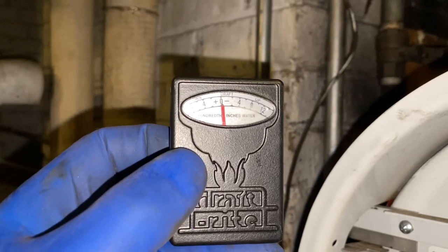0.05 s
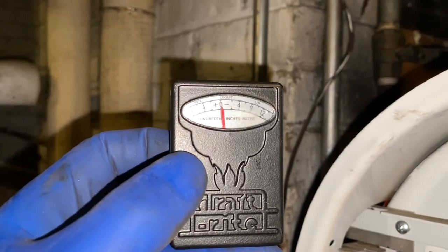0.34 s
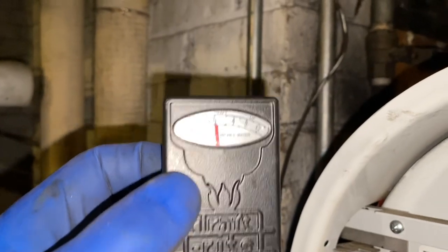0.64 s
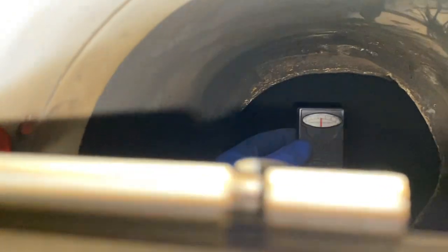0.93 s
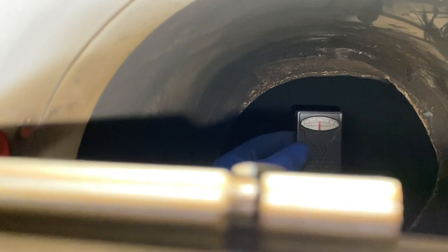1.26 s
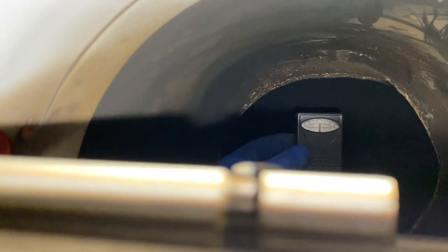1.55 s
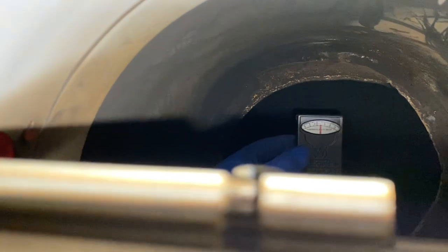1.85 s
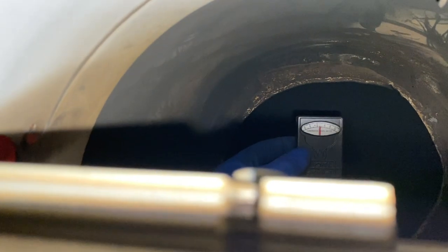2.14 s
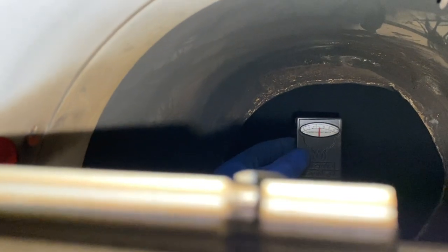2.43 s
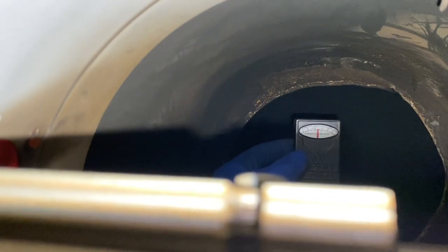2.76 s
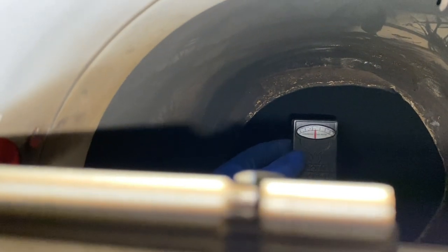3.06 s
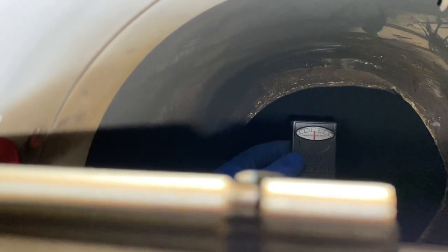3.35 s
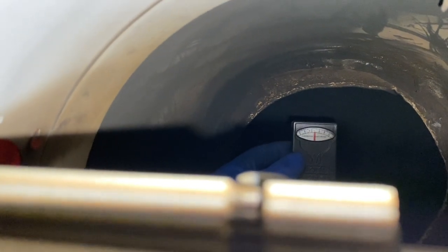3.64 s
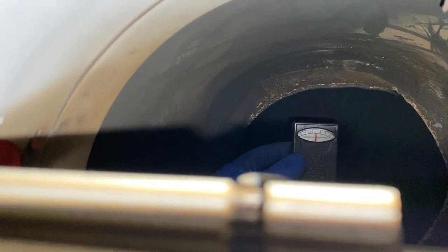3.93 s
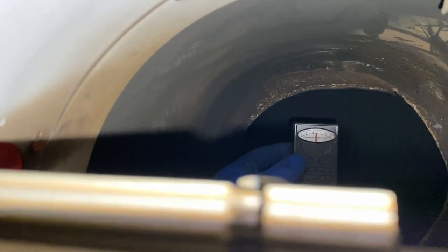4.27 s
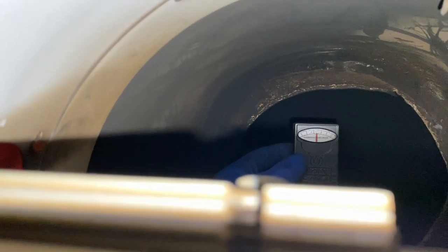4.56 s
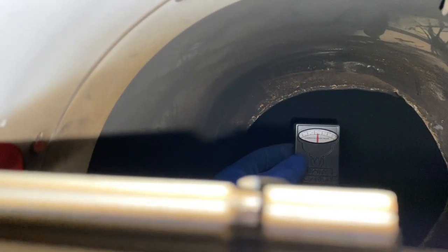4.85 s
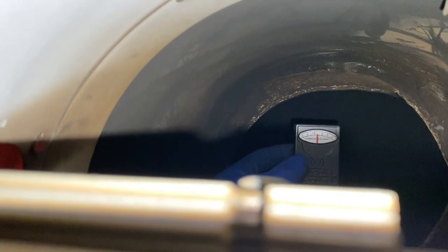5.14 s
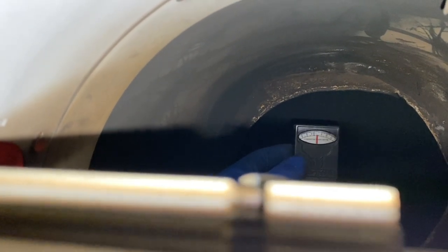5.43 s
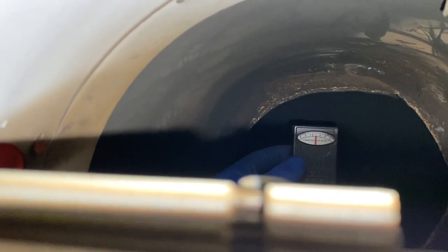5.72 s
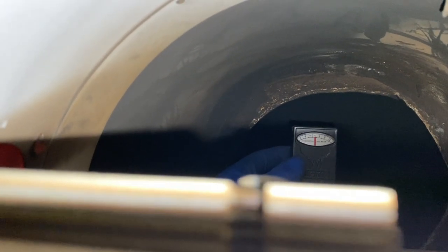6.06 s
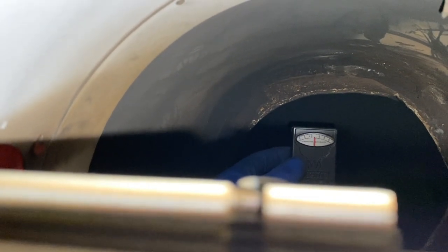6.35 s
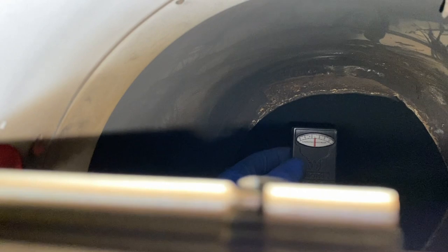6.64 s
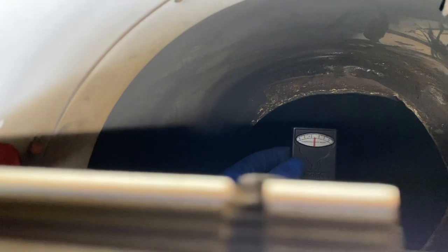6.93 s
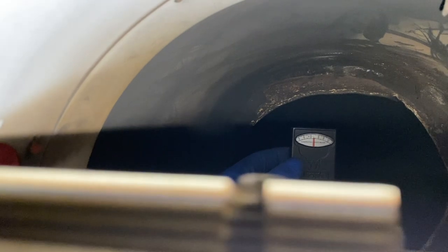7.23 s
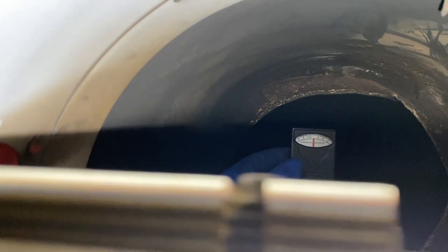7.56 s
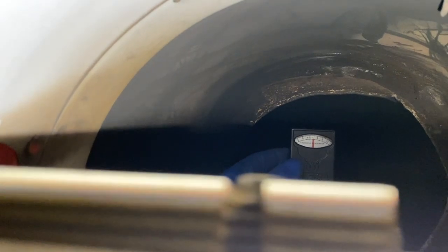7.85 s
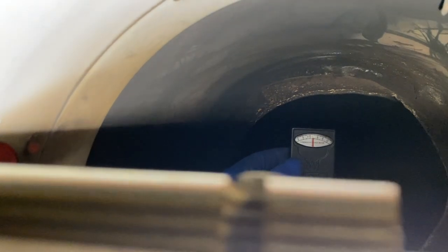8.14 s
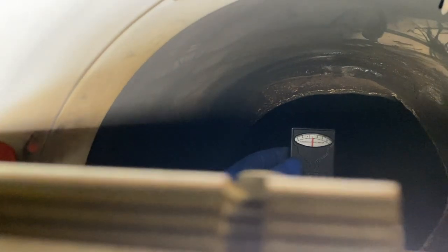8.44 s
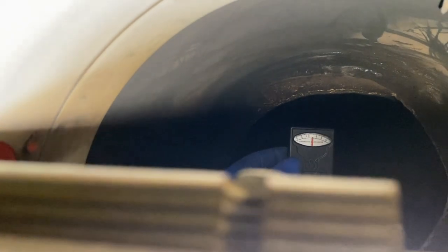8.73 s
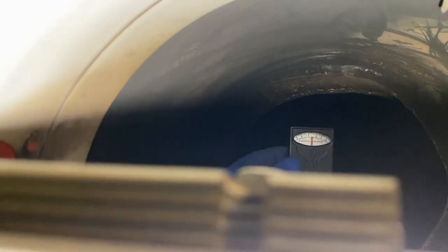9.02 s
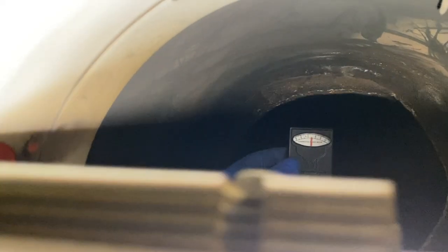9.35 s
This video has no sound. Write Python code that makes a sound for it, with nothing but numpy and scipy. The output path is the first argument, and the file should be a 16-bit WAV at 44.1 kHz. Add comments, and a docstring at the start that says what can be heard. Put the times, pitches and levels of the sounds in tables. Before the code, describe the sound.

The steady low rumble of an oil burner's flame and the rush of blower air fill a boiler room. Almost at once the sound jumps closer and louder, heard at the open port, with a fluttering boom, a hollow wavering note and faint high tones. Light metallic rattling comes and goes, and a gloved hand makes faint clicks, swishes and soft knocks. In the last instant the microphone is farther off, leaving mostly rushing air.

```python
"""First you hear the low boom and airy rush of a large oil burner, from across its boiler room.
Soon you are at the boiler's open port, where it is louder, and for a last instant away from it.
The swirling flame makes the fire chamber boom; the blower's air rushes through ringing ducts and howls
at the port. A loose metal part rattles in spells, once per motor turn, and faint high tones flicker.
A gloved hand holding a gauge makes a few faint clicks, swishes and soft knocks."""
import sys
import numpy as np
from scipy import signal
from scipy.fft import rfft, irfft, next_fast_len
from scipy.io import wavfile
from scipy.ndimage import uniform_filter1d, minimum_filter1d

SR = 44100
rng = np.random.default_rng(int(sys.argv[2]) if len(sys.argv) > 2 else 0)


def log_audio(samples):
    """Write samples as a 16-bit WAV file to the path given in sys.argv[1]."""
    # one column per channel
    frames = np.atleast_2d(samples).T
    # limit to full scale, then quantise
    limited = np.clip(frames, -1, 1)
    pcm = np.round(limited * 32767).astype(np.int16)
    wavfile.write(sys.argv[1], SR, pcm)


N = 418509
TIME = np.arange(N) / SR
SIZE = next_fast_len(N, True)
FREQ = np.maximum(np.arange(SIZE // 2 + 1) * SR / SIZE, 1)
AT_PORT_S, AWAY_S = .756, 9.431  # the listener suddenly changes place at these times

# The fire chamber's modes (pitches it likes to ring at).
# Each row: pitch in Hz, width in Hz, relative strength in dB at the port, then in the room.
CHAMBER_MODES = [(55, 8.9, -46, -50), (63.8, 9.3, -34, -40), (74.8, 18, -40, -50), (96.7, 9.8, -32.5, -41),
                 (120.5, 45, -50.5, -66), (162.8, 16.9, -41.3, -50), (201.4, 14.6, -41, -43.5),
                 (216.6, 25, -50.5, -55), (229, 11.3, -45, -42), (250.7, 14, -58.5, -67),
                 (287.7, 24, -55, -64), (300, 6.4, -56.5, -55)]
# How loud the flame's four bands are, lowest first. Each row: time in seconds, base level in dB.
THROB_LEVELS = [(0.0, -29), (0.12, -24.5), (0.36, -29), (0.42, -33), (0.72, -34), (0.84, -20.5),
                (1.44, -19.5), (1.56, -40), (1.62, -21.5), (1.92, -27), (1.98, -21.5), (2.82, -24),
                (3.18, -21), (3.42, -24), (3.84, -21.5), (3.96, -22.5), (4.56, -20.5), (4.68, -24.5),
                (5.34, -22.5), (8.1, -25), (8.28, -23.5), (8.7, -25), (9.12, -18.5), (9.4, -25.5)]
DRONE_LEVELS = [(0.0, -30.5), (0.66, -38), (0.78, -26), (1.14, -26), (1.32, -33), (1.56, -21.5),
                (1.68, -29.5), (2.1, -26), (3.66, -27), (3.96, -23.5), (4.5, -30.5), (4.68, -22.5),
                (5.4, -27), (5.7, -21.5), (5.88, -30.5), (6.12, -20), (6.36, -25), (7.26, -23.5),
                (7.38, -31), (7.56, -24), (8.7, -26.5), (9.4, -31.5)]
ROAR_LEVELS = [(0.0, -36), (0.3, -31), (0.66, -35), (0.78, -28), (1.98, -25), (4.68, -26.5), (4.8, -28),
               (5.16, -24), (5.28, -28.5), (5.76, -26.5), (6.24, -27.0), (8.16, -25.5), (8.34, -29),
               (9.4, -23.5)]
BOXY_LEVELS = [(0, -45), (.72, -42.5), (1.18, -33), (1.45, -39.5), (2.4, -36.5), (3.4, -37.5), (4.35, -40),
               (6.2, -39.5), (7.7, -37), (8.2, -41), (9.05, -36), (9.4, -38)]
# Moments when throb and drone falter. Each row: time in seconds, dip in dB.
FLAME_DIPS = [(.12, -8), (.42, -4), (1.34, -8), (1.73, -5), (7.47, -9), (8.84, -9)]

# The blower's rush at the port, in the room and away. Each row: pitch in Hz, base level in dB per Hz.
RUSH_AT_PORT = [(20, -58), (50, -49), (150, -54.5), (360, -66.5), (640, -70.5), (1150, -73.5),
                (1500, -74.5), (2800, -80), (3600, -82), (4600, -87), (5800, -87.5), (7200, -94),
                (11500, -99), (15000, -105)]
RUSH_IN_ROOM = [(20, -70), (70, -55.5), (250, -61.5), (450, -65), (1000, -69.5), (2000, -75), (3000, -78.5),
                (4500, -82.5), (7000, -90.5), (9000, -95), (12000, -99), (15000, -103)]
RUSH_AWAY = [(20, -76), (70, -58), (240, -59), (400, -65), (560, -56), (750, -61.5), (2000, -66),
             (6000, -79), (10000, -84), (12500, -89), (15000, -98)]
# Modes of the ducts, the casing and the open port, then some faint narrow tones.
# Each row: pitch in Hz, width in Hz, relative strength in dB on the left, then on the right.
DUCT_MODES = [(448, 69, -63.5, -69.5), (696.3, 58, -62.5, -63.5), (754, 16, -60, -67), (774, 25, -63, -64),
              (897, 51, -63, -66.5), (971, 29, -65, -75), (1057, 43, -63.5, -67), (1139, 63, -69, -67),
              (1199, 30, -66.5, -68.5), (1285, 35, -68, -68), (1533, 35, -77, -73), (1710, 28, -73, -69.5),
              (1863, 35, -74.5, -72)]
CASING_MODES = [(319, 30, -58, -57), (367, 19, -60, -63), (516, 21, -56, -55.5), (569, 25, -54.5, -57),
                (860, 85, -65, -67), (1280, 24, -73, -68), (1510, 25, -75, -70), (2460, 300, -80, -75),
                (3267, 84, -73, -68.5), (5280, 94, -82, -82)]
HOWL_MODES = [(507.7, 36, -58, -61.5), (529.2, 15, -53, -57), (543, 12, -65, -52.5),
              (566, 11.7, -52.5, -58), (575.4, 20, -62.5, -59), (607, 16.4, -59.5, -70.5)]
FAINT_TONES = [(2204, 35, -76.5, -73.5), (2390, 16, -73, -73.5), (2423, 15, -77, -77.5),
               (2447, 65, -80, -77), (2584, 37, -77, -79), (2633, 51, -79, -73.5), (2973, 90, -76.5, -78.5),
               (3180, 42, -76.5, -81), (3307, 57, -75.5, -77), (3880, 65, -84, -87)]
# How loud the port's hollow note is. Each row: time in seconds, base level in dB.
HOWL_LEVELS = [(0.76, -38), (1.78, -40.5), (2.26, -40), (2.38, -39), (3.04, -39.5), (3.4, -45), (3.64, -36),
               (3.88, -42.5), (4.18, -37.5), (5.62, -37.5), (5.74, -44), (5.86, -37.5), (7.06, -41),
               (7.12, -38), (7.54, -40), (7.78, -36.5), (8.2, -38.5), (8.44, -37.0), (8.62, -44),
               (8.74, -36.5), (8.92, -40), (9.04, -34), (9.22, -41), (9.4, -37)]
# Faint whines. Each row: middle in seconds, level in dB, half length in seconds, pitch in Hz.
FAINT_WHINES = [(2.5, -57, .5, 2400), (3.62, -53, 0.18, 2980), (5.1, -57, 0.65, 2385),
                (8.15, -56, 0.1, 3000), (8.72, -57, .22, 2380)]

# Spells when the motor keeps the loose part stirring. Each row: start and end in seconds.
RESTLESS_SPELLS = [(2.28, 6.7), (7.5, 11)]
# Its clearest rattles. Each row: middle in seconds, base level in dB, length in seconds.
CLEAR_RATTLES = [(2.40, -51, 0.054), (2.51, -53, .05), (2.68, -52.5, 0.17), (3.007, -52, 0.097),
                 (3.23, -61, .09), (3.424, -48, 0.058), (3.535, -49.5, 0.054), (3.803, -50, 0.12),
                 (3.947, -52.5, .06), (4.22, -60, .05), (4.43, -50, 0.096), (4.525, -49, .05),
                 (4.68, -62, .06), (4.87, -54, .05), (5.17, -55, 0.3), (5.405, -53, 0.065),
                 (5.507, -50, .06), (5.758, -56, .08), (6.12, -55, .07), (6.26, -50, .07),
                 (6.483, -52, 0.077), (6.87, -58, .05), (7.65, -51, .04), (7.803, -54, 0.036),
                 (8.023, -55, .08), (8.17, -55, .06), (8.38, -52.5, 0.23), (8.697, -54, .04),
                 (8.812, -52, .05), (9.13, -53, .06), (9.33, -54, 0.14)]
# Modes of the loose part. Each row: pitch in Hz, width in Hz, relative strength in dB.
LOOSE_PART_MODES = [(4090, 230, 9.5), (6650, 160, 1), (7170, 94, 10), (7350, 74, 9), (7450, 73, 3),
                    (10450, 200, -2.5), (11600, 600, 0)]
# Soft knocks on the boiler. Each row: start in seconds, peak in dB, the hand's damping time in seconds.
HAND_KNOCKS = [(1.467, -21, .005), (8.743, -16.5, 0.0047), (9.464, -19, 0.028)]
# Modes of the knocked steel. Each row: pitch in Hz, seconds to fade by 60 dB, relative strength in dB.
STEEL_MODES = [(344, 0.035, 5), (432, 0.037, 3.5), (577, 0.093, -0.5), (700, 0.04, -6), (800, .05, -7)]
# Clicks of the gauge. Each row: start in seconds, base level in dB, fading time in seconds.
GAUGE_CLICKS = [(0.118, -37, .008), (.129, -47, 0.0055), (.522, -41, 0.0092)]
# Bright bands that colour the faint clicks. Each row: pitch in Hz, width in Hz, relative strength in dB.
CLICK_BANDS = [(3200, 500, -6), (4500, 490, -3), (5350, 320, 2), (6850, 260, -4.5), (7650, 250, -17),
               (11700, 980, -7), (12800, 830, -11)]
# The glove brushes the port's rim.
# Each row: middle in seconds, level in dB, half length in seconds, centre pitch in Hz.
GLOVE_BRUSHES = [(1.863, -44, .018, 2700), (3.8, -54, .02, 5000), (6.28, -47, 0.018, 4200),
                 (6.5, -53, .025, 4600)]

# How the two microphones differ in tone. Each row: pitch in Hz, left minus right in dB.
MIC_BALANCE = [(100, 2), (400, 0.5), (900, -2), (1500, -3), (2500, -1), (3400, -1.5), (4500, 5),
               (5700, -0.5), (15000, 0)]
# Rush that reaches both microphones by the same paths. Each row: pitch in Hz, share from 0 to 1.
SHARED_SHARE = [(400, 0.3), (750, 0.41), (1200, 0.19), (1900, 0.11), (3000, 0.14), (4500, 0.35),
                (5700, 0.09), (7400, 0.85), (8300, 0)]
# How far the left leads the right on those paths. Each row: pitch in Hz, lead in radians.
LEFT_LEAD = [(470, 0), (575, 1.6), (720, 0), (850, 2), (1160, -0.34), (1300, 3.5), (1700, 4.5), (2200, 4.5),
             (3200, 7.6), (3700, 6.5)]
# Share of the remaining hiss whose left and right are by turns alike and opposed as the pitch rises.
# Each row: pitch in Hz, share from 0 to 1.
ALTERNATING_SHARE = [(100, 0.1), (450, 0.48), (650, 0.03), (1800, 0.06), (3000, 0.08), (4000, 0.25),
                     (5500, 0.16), (7200, 1), (12000, 1)]


def flame(splits_hz=(83, 132, 262), flutter_rate=17, dip_s=0.029):
    """Swirling fire makes the chamber's modes boom; four bands of them swell and flutter separately."""
    turbulence = noise() * np.sqrt(mode_power(CHAMBER_MODES))
    below_low, below_mid, below_top = (1 / (1 + (FREQ / hz) ** 20) for hz in splits_hz)
    dips = sum(db * bump(s, dip_s) for s, db in FLAME_DIPS)
    out = 0
    for band, base_db, trim_db, flutter_db in (
            (below_low, curve(THROB_LEVELS) + dips, 0.24, 0.9),
            (below_mid - below_low, curve(DRONE_LEVELS) + dips, -0.53, 1.74),
            (below_top - below_mid, curve(ROAR_LEVELS), -0.45, 1.45),
            (1 - below_top, curve(BOXY_LEVELS), -1.0, 1.6)):
        level_db = base_db + trim_db + flutter_db * wander(flutter_rate)
        port, room = map(unit, to_wave(turbulence * band))
        out = out + undb(level_db) * steady(room + after(AT_PORT_S) * (port - room))
    return out * (1 - after(AWAY_S))


def blower():
    """The blower's air rushes; the casing rings along in the room, and the ducts do at the port."""
    air = rushing_air() * standing_waves()
    balance = undb(colour(MIC_BALANCE) * np.array([[1], [-1]]) / 2)
    room_power = undb(colour(RUSH_IN_ROOM)) ** 2 + mode_power(CASING_MODES)
    port_power = (balance * undb(colour(RUSH_AT_PORT))) ** 2 + mode_power(DUCT_MODES)
    room = to_wave(air * np.sqrt(room_power))
    port = to_wave(air * np.sqrt(port_power))
    away = to_wave(air * undb(colour(RUSH_AWAY)))
    return room + after(AT_PORT_S) * (port - room) + after(AWAY_S) * (away - port)


def howl(trim_db=-0.45, pulse_db=1.5, pulse_rate=20, shared_gain=1.38):
    """The draught blows across the open port, whose hollow note surges and sinks."""
    draught = shared_gain * shared_noise() + noise_pair()
    note = steady(to_wave(draught * np.sqrt(mode_power(HOWL_MODES))))
    level_db = curve(HOWL_LEVELS) + trim_db + pulse_db * wander(pulse_rate)
    return note * undb(level_db) * (after(AT_PORT_S) - after(AWAY_S))


def loose_part(motor_hz=58.9, decay_turns=0.79, stir_db=-66, swing_db=9.5, stir_rate=22, trim_db=-1.0):
    """A loose metal part chatters and rings once per motor turn, in restless spells and short rattles."""
    turn = TIME * motor_hz % 1
    chatter = rfft(np.exp(-turn / decay_turns) * rng.standard_normal((2, N)), SIZE)
    ring = unit(to_wave(cross_mix(*chatter) * ringing(LOOSE_PART_MODES)))
    spells = sum(after(start) - after(end) for start, end in RESTLESS_SPELLS)
    spells = uniform_filter1d(spells, int(0.13 * SR))  # fade each spell in and out
    stirring = spells * undb(stir_db + swing_db * np.tanh(wander(stir_rate)))
    rattles = sum(undb(db) * bump(s, length / 2) for s, db, length in CLEAR_RATTLES)
    return ring * np.maximum(stirring, rattles) * undb(trim_db)


def knocks(push_s=0.0034):
    """Padded blows ring the steel's low modes; the resting hand soon damps them."""
    t = TIME[:SR // 4]
    ring = sum(undb(db - 60 * t / fade_s) * np.sin(2 * np.pi * hz * t) for hz, fade_s, db in STEEL_MODES)
    out = np.zeros(N + len(t))
    for s, db, damp_s in HAND_KNOCKS:
        blow = ring * (1 - np.exp(-t / push_s)) * np.exp(-t / damp_s)
        start = int(s * SR)
        out[start:start + len(t)] += undb(db) * blow / np.abs(blow).max()
    return out[:N]


def tick(gain_db=-11.5):
    """One sharp, dry tick sounds just as the scene changes."""
    impulse = np.exp(-2j * np.pi * FREQ * AT_PORT_S)
    return undb(gain_db) * to_wave(impulse * resonance(hz=3000, width_hz=7500) ** 2)


def gauge_clicks(stereo_spread=0.61, bands_db=11, scrape_db=-3, soften_hz=12500):
    """Tiny slips of the soft glove scrape the gauge; bright bands colour the faint clicks."""
    slips = sum(undb(db) * (TIME >= s) * np.exp(-np.abs(TIME - s) / fade_s)
                for s, db, fade_s in GAUGE_CLICKS)
    friction = rng.standard_normal(N) + stereo_spread * rng.standard_normal((2, N))
    grit = rfft(slips * friction, SIZE) / (1 + (FREQ / soften_hz) ** 10)
    bands = undb(bands_db) * ringing(CLICK_BANDS)
    scrape = undb(scrape_db) * resonance(hz=5800, width_hz=3000)
    return to_wave(grit * (bands + scrape))


def glove_brushes(width_share=0.48):
    """Rubber slides over steel in short, soft swishes."""
    rub = noise_pair()
    return sum(undb(db) * bump(s, half_s) * unit(to_wave(rub * resonance(hz, width_share * hz) ** 2))
               for s, db, half_s, hz in GLOVE_BRUSHES)


def faint_tones(flicker_db=2.5, flicker_rate=20, trim_db=0.1):
    """Faint narrow tones between 2 and 4 kHz, each flickering in level."""
    hiss = noise_pair()
    out = 0
    for row in FAINT_TONES:
        tone = to_wave(hiss * np.sqrt(mode_power([row])))
        out = out + tone * undb(trim_db + flicker_db * wander(flicker_rate))
    return out * after(AT_PORT_S)


def whines(width_hz=36):
    """Now and then one high tone sings a little more clearly, wavering."""
    hiss = noise()
    return sum(undb(db) * bump(s, half_s) * unit(to_wave(hiss * resonance(hz, width_hz)))
               for s, db, half_s, hz in FAINT_WHINES)


def rushing_air(alike_hz=280):
    """Left and right spectra of the rush: part shared, part separate, part alike or opposed by pitch."""
    alternating = colour(ALTERNATING_SHARE)
    air = np.sqrt(alternating) * cross_mix(noise(), noise()) + np.sqrt(1 - alternating) * noise_pair()
    # long, low waves reach both microphones alike
    alike = np.maximum(1 / (1 + (FREQ / alike_hz) ** 2), colour(SHARED_SHARE))
    return np.sqrt(alike) * shared_noise() + np.sqrt(1 - alike) * air


def standing_waves(spacing_hz=14, depth_db=1.5, full_depth_hz=1200):
    """The bare walls boost some pitches and weaken others, differently at each microphone."""
    hz = np.arange(0, SR / 2, spacing_hz)
    ripple = np.array([np.interp(FREQ, hz, rng.standard_normal(len(hz))) for _ in range(2)])
    return undb(depth_db * ripple * np.minimum(FREQ / full_depth_hz, 1))


def shared_noise():
    """One noise reaches both microphones, put out of step by reflections from the boiler."""
    return noise() * np.exp(.5j * colour(LEFT_LEAD) * np.array([[1], [-1]]))


def cross_mix(left, right, lag_ms=0.277):
    """Each side gets a late copy of the other, making them alike at some pitches, opposed at others."""
    delay = np.exp(-2j * np.pi * FREQ * lag_ms / 1000)
    return np.array([left + delay * right, right + delay * left]) / np.sqrt(2)


def resonance(hz, width_hz):
    """How one mode answers each pitch, with gain 1 at its centre."""
    return 1 / (1 + 1j * (FREQ ** 2 - hz ** 2) / (FREQ * width_hz))


def ringing(modes):
    """How several resonances together answer each pitch."""
    return sum(undb(db) * resonance(hz, width) for hz, width, db in modes)


def mode_power(modes):
    """Power at each pitch of steep, separately driven modes; one result per dB column."""
    return sum(undb(dbs)[:, None] ** 2 / (1 + ((FREQ ** 2 - hz ** 2) / (FREQ * width)) ** 2) ** 2
               for hz, width, *dbs in modes)


def noise():
    """Spectrum (the mix of pitches) of fresh white noise at 0 dB per Hz."""
    return rfft(rng.standard_normal(SIZE)) * np.sqrt(SR / 2)


def noise_pair():
    """Separate noise spectra for left and right."""
    return np.array([noise(), noise()])


def to_wave(spectrum):
    """Turn a spectrum into a waveform."""
    return irfft(spectrum, SIZE)[..., :N]


def wander(rate):
    """Smooth random drift of about 1 either way, with `rate` new values a second."""
    hold = int(SR / rate)
    steps = np.repeat(rng.standard_normal(N // hold + 1), hold)
    return 1.3 * uniform_filter1d(uniform_filter1d(steps, hold), hold)[:N]


def bump(s, half_length_s):
    """Smooth rise and fall around time s."""
    distance = np.abs(TIME - s) / half_length_s
    return np.exp(-distance ** 2) * (distance < 4)


def after(s):
    """Go from 0 to 1 in a millisecond at time s."""
    return np.clip((TIME - s) * 1000, 0, 1)


def curve(rows):
    """Join (seconds, value) rows with straight lines."""
    return np.interp(TIME, *np.transpose(rows))


def colour(rows):
    """Join (Hz, value) rows, giving every octave equal room."""
    hz, value = np.transpose(rows)
    return np.interp(np.log(FREQ), np.log(hz), value)


def steady(x, span_s=.13):
    """Even out slow changes in level but keep the quick flutter."""
    power = np.mean(np.atleast_2d(x), axis=0) ** 2
    return x / np.sqrt(uniform_filter1d(power, int(span_s * SR)))


def unit(x):
    """Scale to an average power of 1."""
    return x / np.sqrt(np.mean(x ** 2))


def undb(db):
    """Turn decibels into a gain."""
    return 10 ** (np.asarray(db) / 20)


def scene():
    """Add up the flame, the blower and the small noises around them."""
    burner = flame() + blower() + howl() + faint_tones() + whines() + loose_part()
    return burner + gauge_clicks() + glove_brushes() + tick() + knocks()


def record(dry, left_louder_db=0.4, low_cut_hz=27, high_cut_hz=15800, ceiling=.36, hold_s=.02):
    """Lean a little to the left, ease the tallest waves down and cut the deepest bass and the very top."""
    dry = dry * undb([[left_louder_db / 2], [-left_louder_db / 2]])
    dry = signal.sosfilt(signal.butter(2, low_cut_hz, "high", fs=SR, output="sos"), dry)
    hold = int(hold_s * SR)
    gain = np.minimum(1, ceiling / (np.abs(dry).max(axis=0) + 1e-9))
    gain = uniform_filter1d(minimum_filter1d(gain, hold), hold)
    return signal.sosfilt(signal.ellip(8, .2, 70, high_cut_hz, fs=SR, output="sos"), dry * gain)


dry = scene()
out = record(dry)
log_audio(out)
```